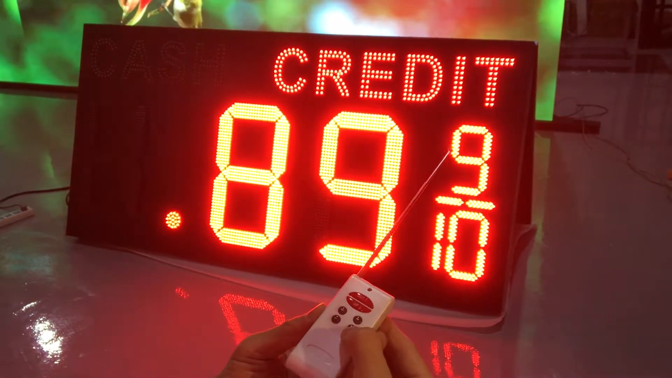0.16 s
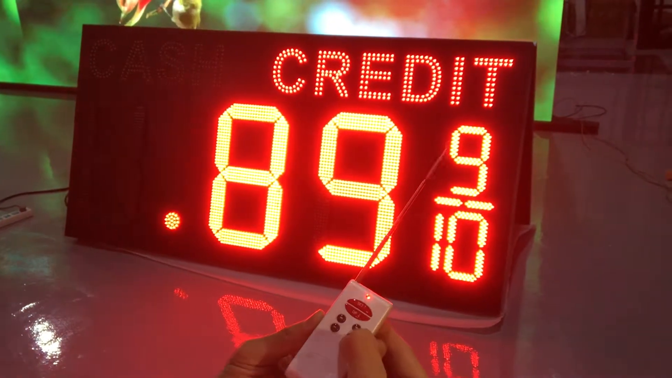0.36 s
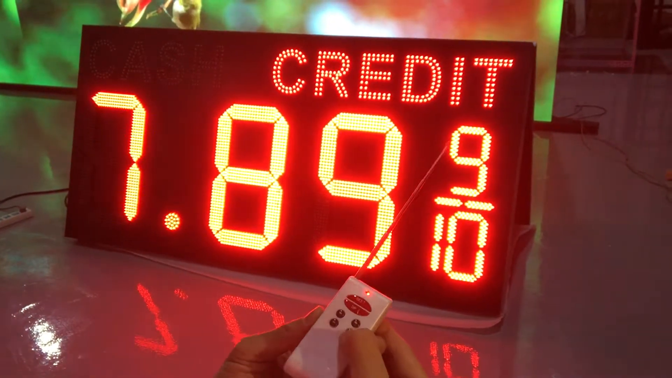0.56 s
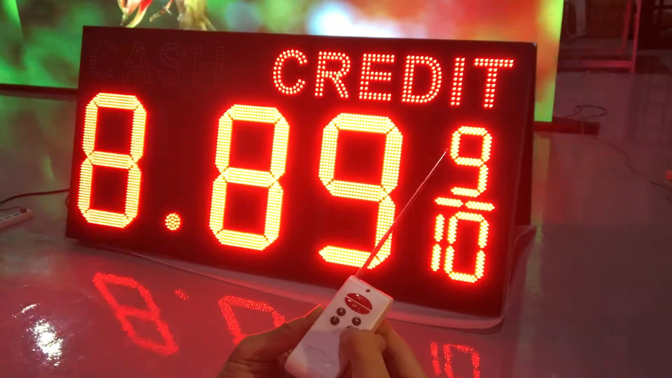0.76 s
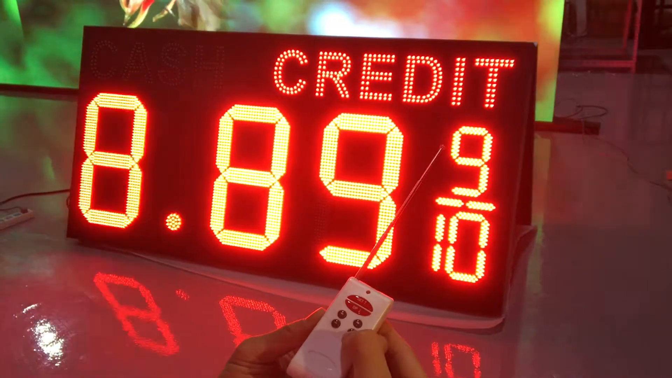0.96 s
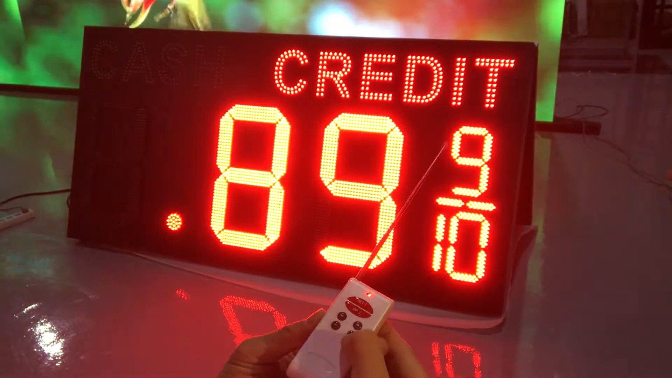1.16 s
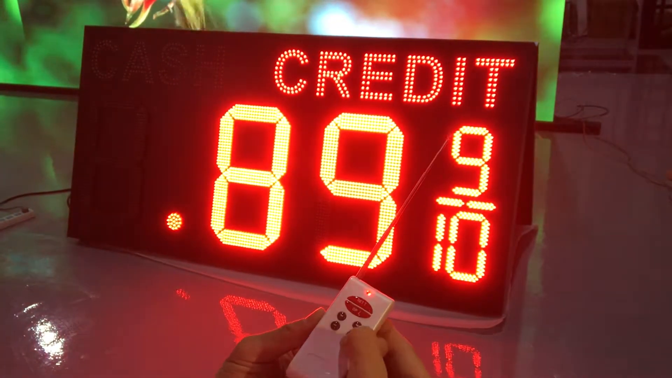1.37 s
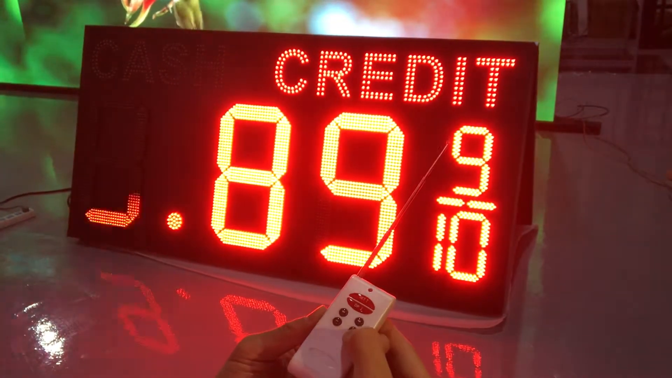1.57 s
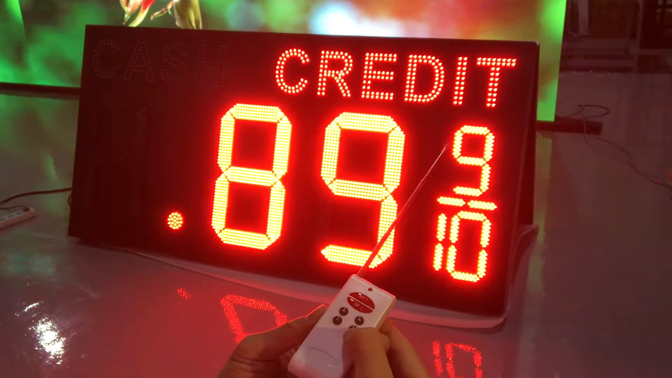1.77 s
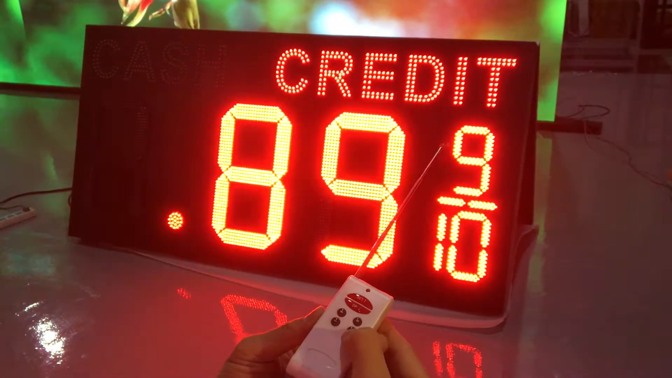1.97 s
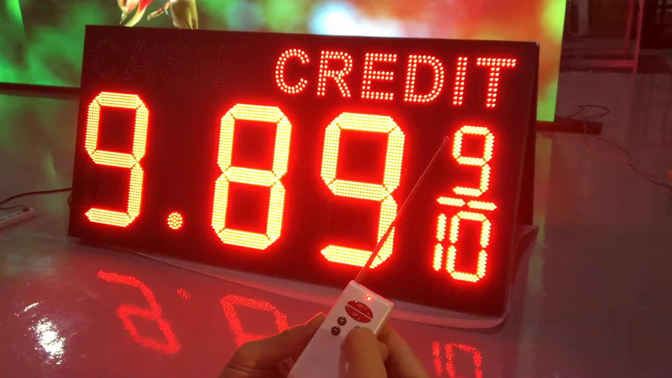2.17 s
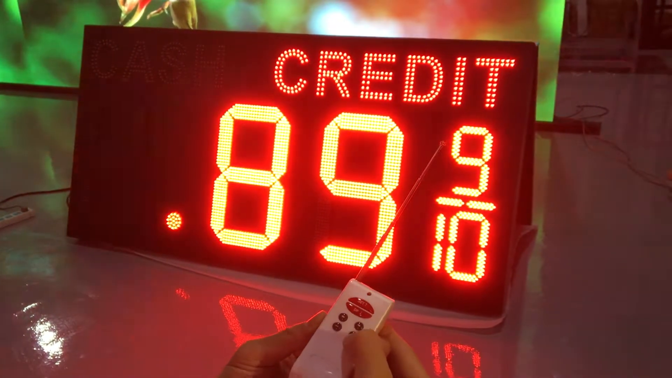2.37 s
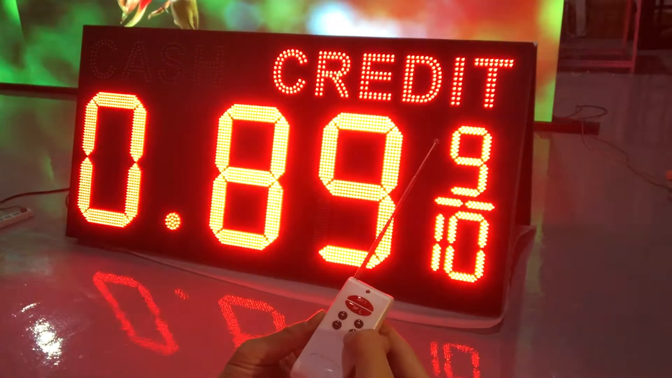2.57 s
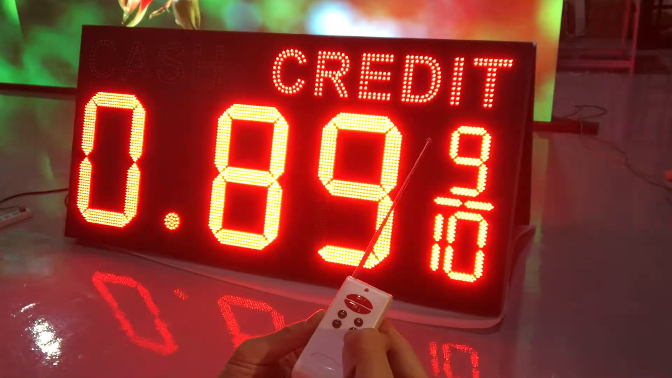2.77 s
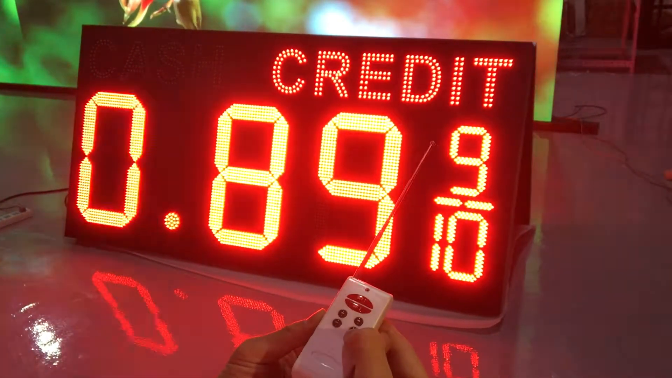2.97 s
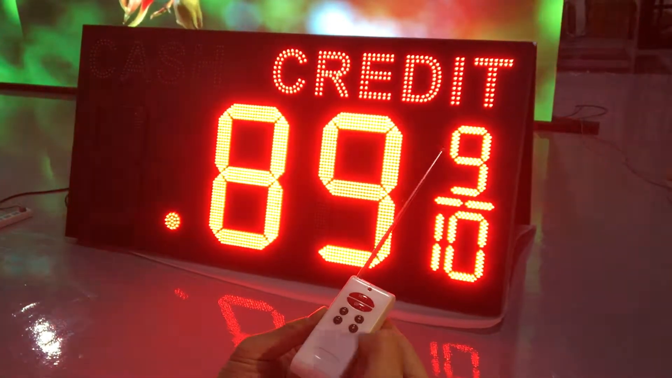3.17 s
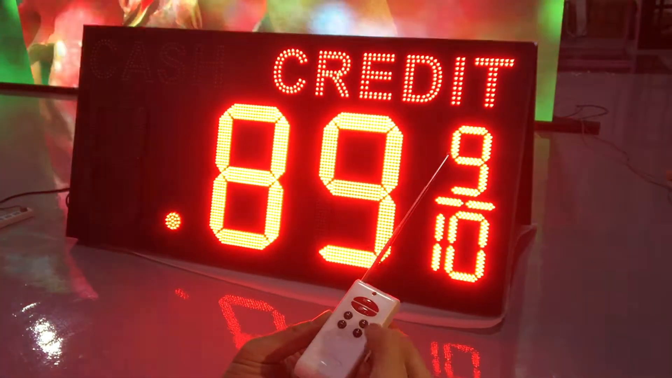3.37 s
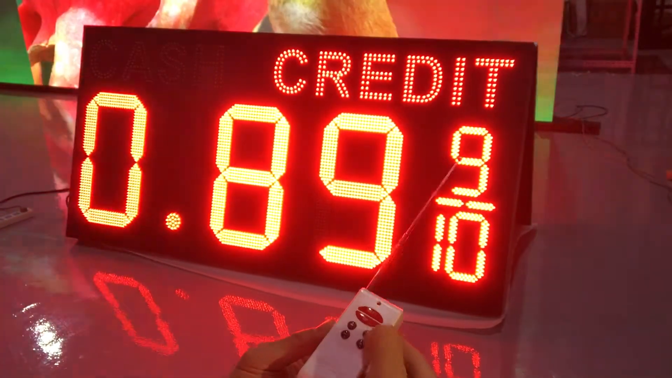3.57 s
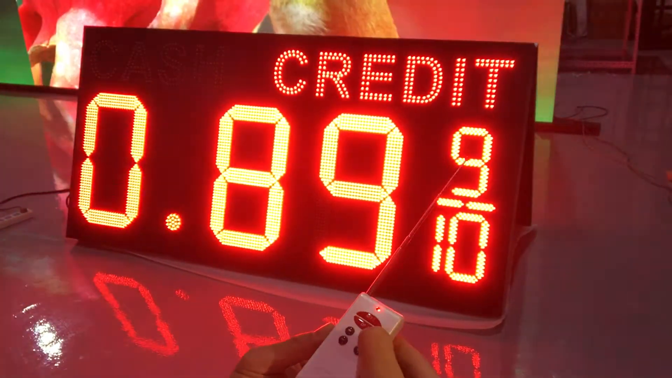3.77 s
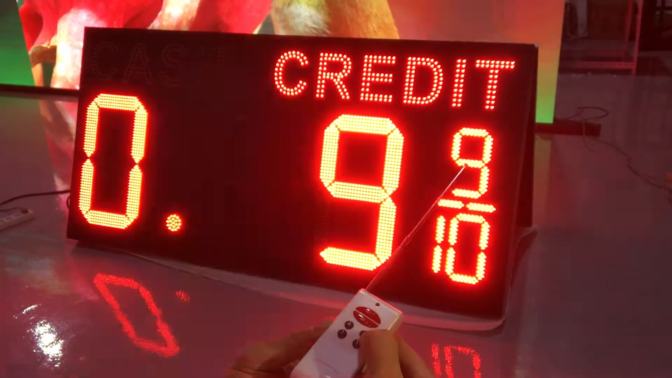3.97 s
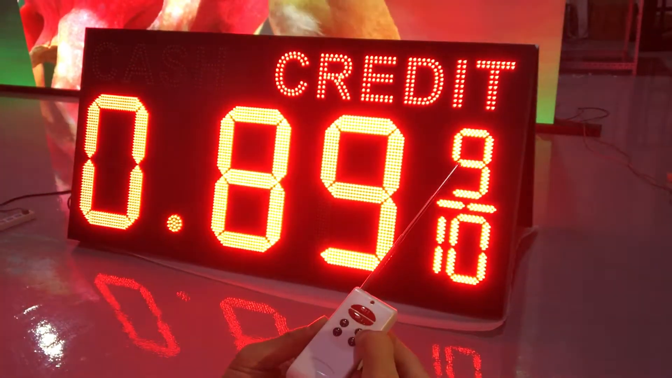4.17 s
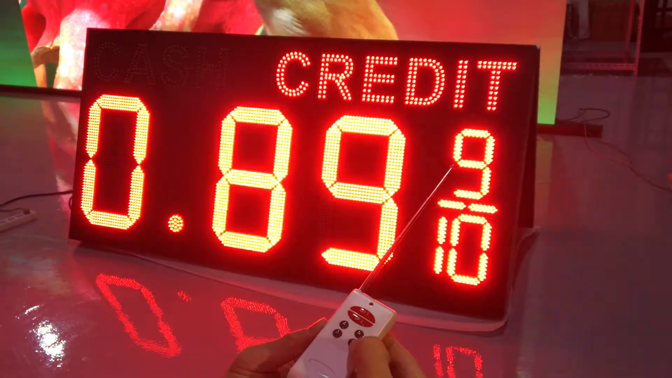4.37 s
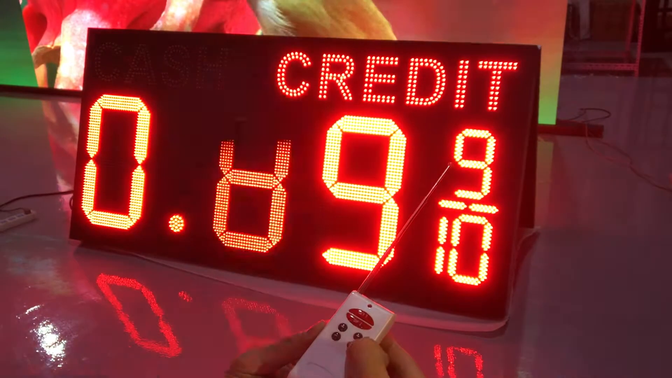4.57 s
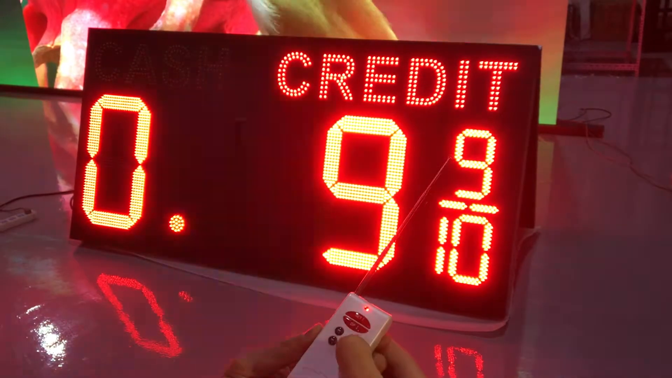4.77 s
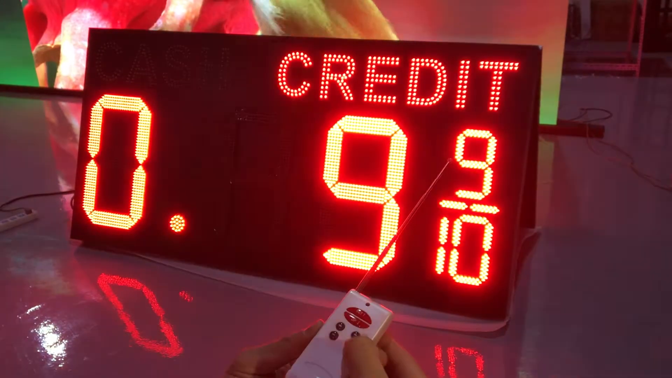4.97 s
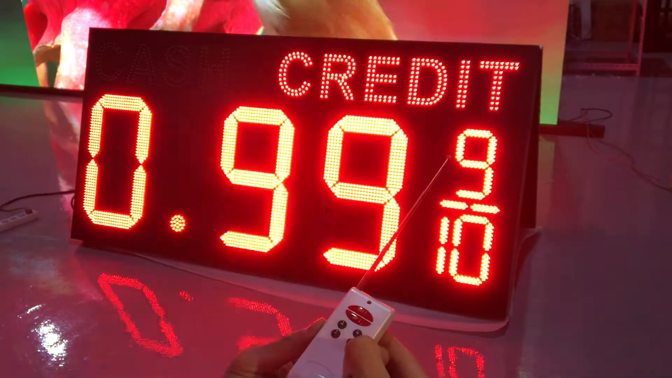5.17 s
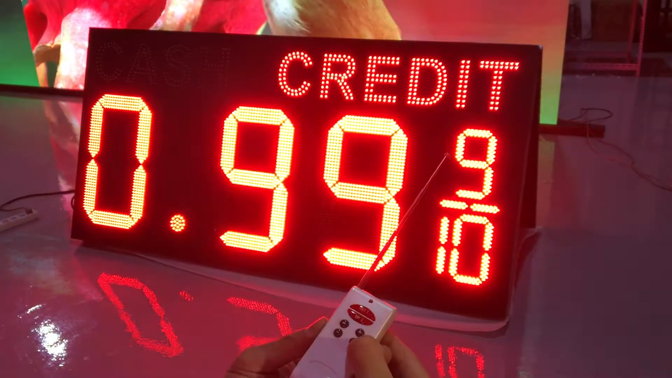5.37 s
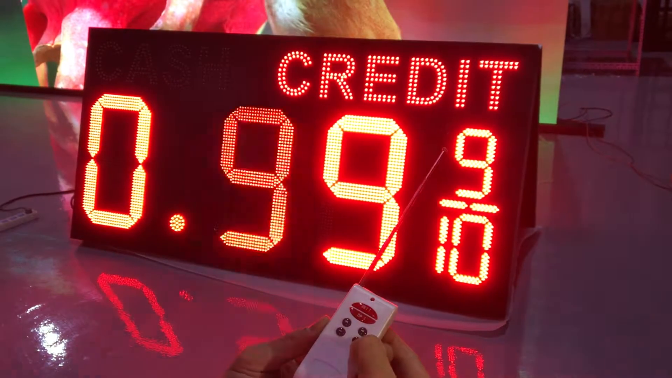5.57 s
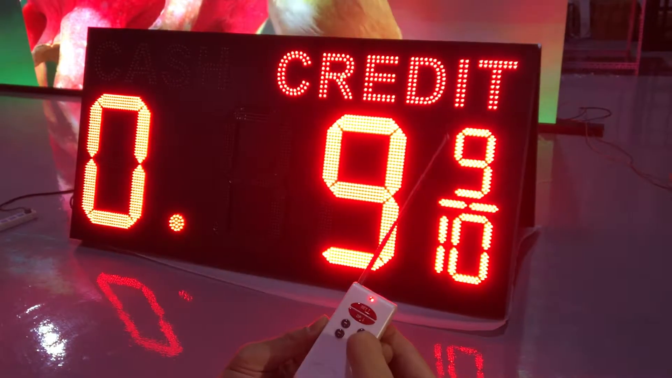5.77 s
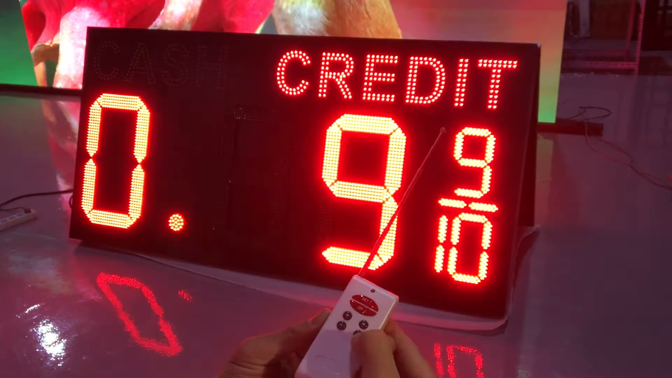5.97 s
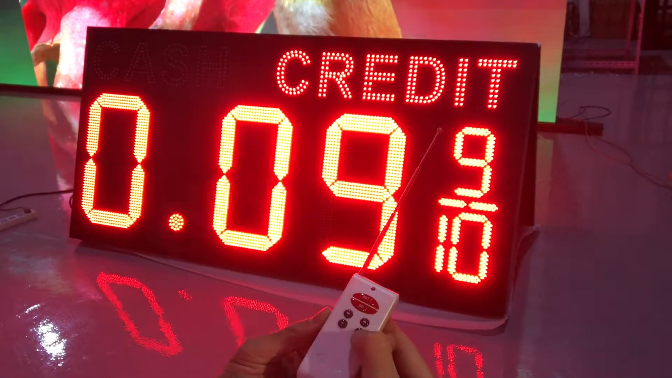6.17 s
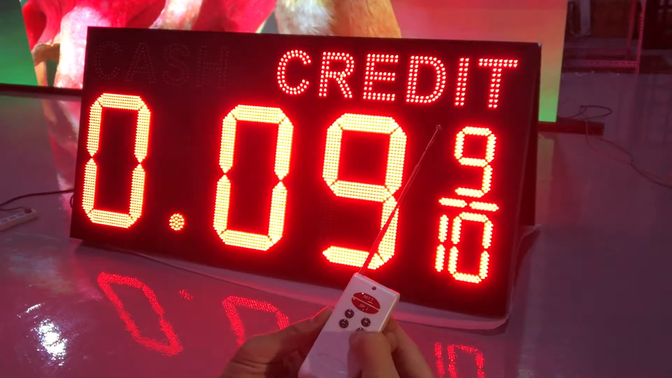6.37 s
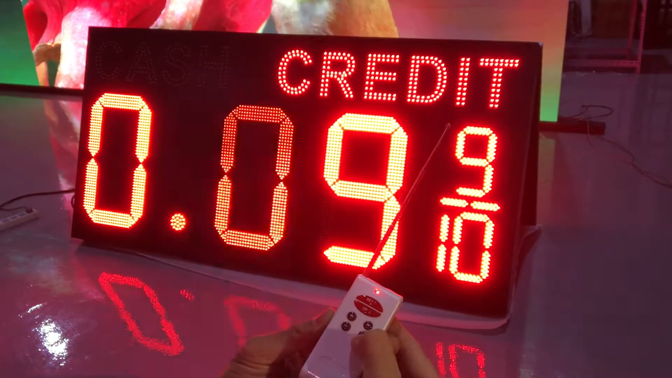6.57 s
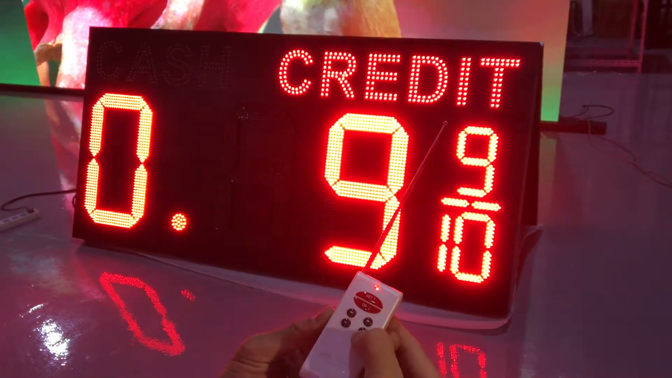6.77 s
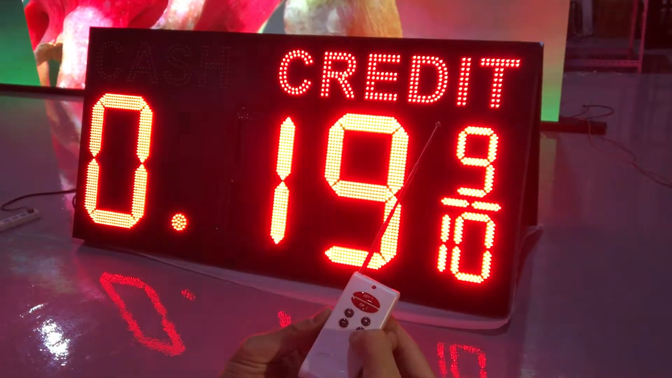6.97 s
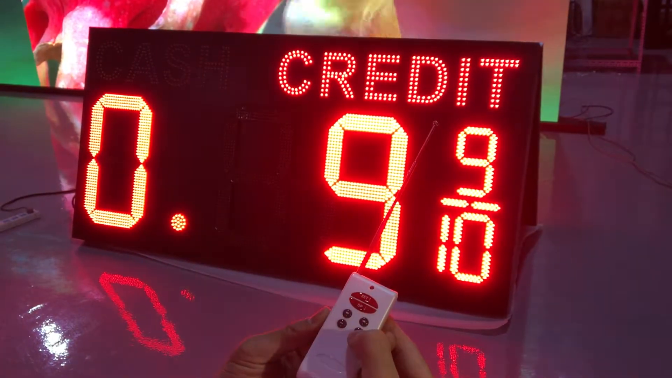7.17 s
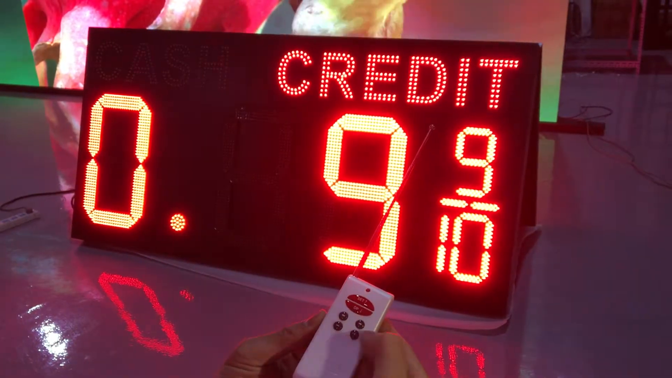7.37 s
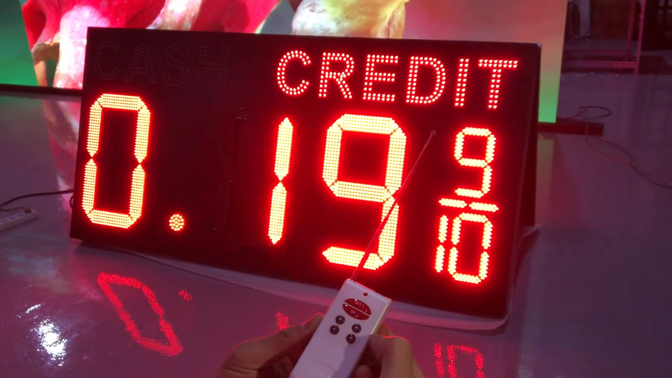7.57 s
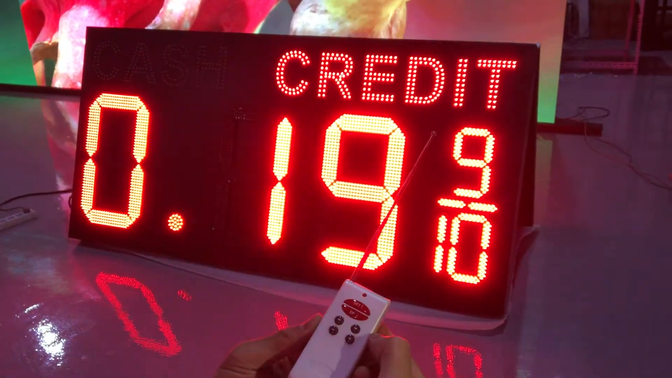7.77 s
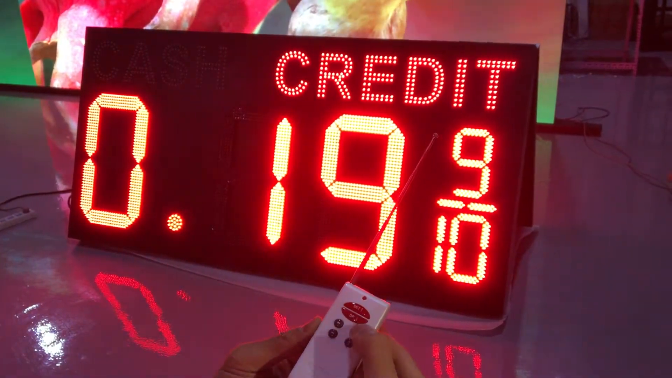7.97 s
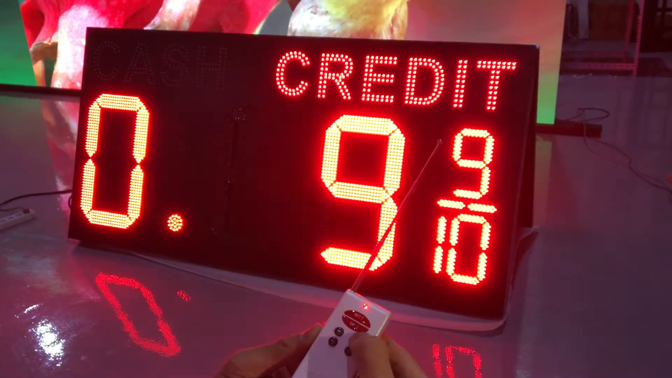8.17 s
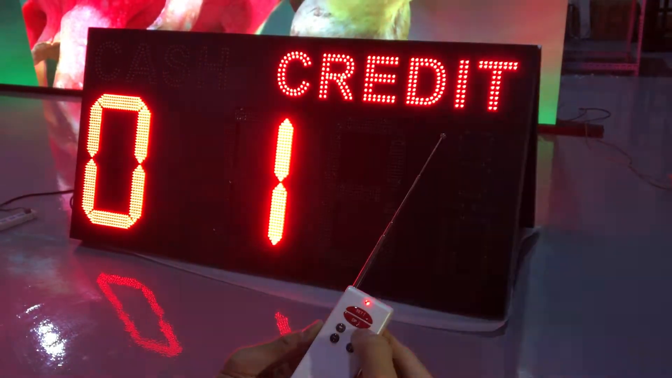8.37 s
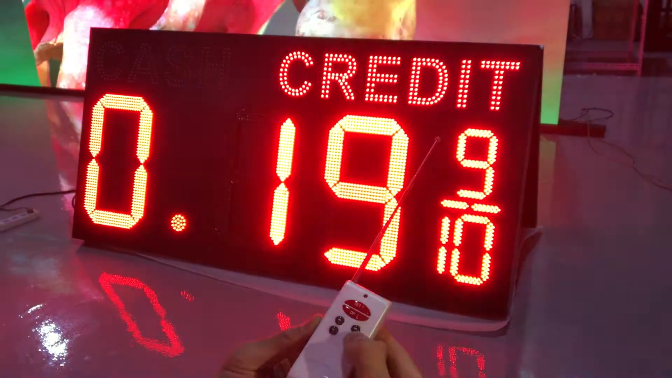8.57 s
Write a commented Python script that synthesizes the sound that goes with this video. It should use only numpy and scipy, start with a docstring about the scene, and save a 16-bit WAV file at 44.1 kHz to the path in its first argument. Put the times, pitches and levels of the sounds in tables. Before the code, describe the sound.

Close plastic remote control buttons click down and spring back about once a second over a faint ventilation hum.

```python
"""Remote control clicks in a hall

A thumb works the buttons of a small plastic remote eight times, close up, with faint ticks and rubs.
Each metal dome snaps down and springs back, and both snaps ring the case for a few milliseconds.
The floor and a large hall answer softly. Underneath lies a bed of humming ventilation,
a thin electrical whine and far-off noise that swells and fades."""
import sys
import numpy as np
from scipy import signal
from scipy.fft import rfft, irfft
from scipy.io import wavfile

SR = 44100
rng = np.random.default_rng(int(sys.argv[2]) if len(sys.argv) > 2 else 0)


def transcribe(u):
    """Save the signal u as a 16-bit wav file named by the first command-line argument.

    u: samples, shape (n,) or (channels, n), limited to [-1, 1]; the rate is SR.
    q: integer samples, one column per channel.
    """
    v = np.clip(np.atleast_2d(u).T, -1, 1)
    q = np.round(v * 32767).astype(np.int16)
    wavfile.write(sys.argv[1], SR, q)


N = 380583

# colour of the hall's steady air: freq_hz, relative_db
AIR_SPECTRUM = [(22, -17.5), (45, -3), (70, -1), (120, -2), (200, -4.5), (270, -11), (350, -10),
                (470, -18.5), (800, -23.5), (1600, -25.5), (3200, -35), (4800, -42.5), (10000, -47),
                (16000, -49)]
# resonances of the ventilation ducts: centre_hz, width_hz, level_db
DUCT_RESONANCES = [(51.3, 25, -57), (96, 8.8, -60), (297.5, 13, -72), (609, 143, -69.5)]
# colour of the far-off noise: freq_hz, relative_db
FAR_SPECTRUM = [(60, -9), (150, 1.5), (330, -0.5), (600, -12.5), (900, -13), (1600, -14.5), (3000, -24),
                (6000, -36.5), (12000, -50.5)]
# swells of the far-off noise: start_s, until_release_s, level_db
FAR_SURGES = [(1.55, 0.44, -57), (2.6, 0.56, -55.5), (3.581, 0.35, -55.5), (7.15, 0.42, -66.5)]
# thin tones of the electrical whine: pitch_hz, level_db
WHINE_TONES = [(2606, -91.5), (2842, -95), (3354, -88)]
# resonances of the plastic case: pitch_hz, t60_ms, down_db, back_db
CASE_MODES = [(1195, 9.4, -30.5, -29), (1764, 9.1, -31, -28.5), (2648, 7.8, -33, -30.5),
              (2915, 5.5, -28.5, -30), (3673, 12.3, -26.5, -26), (4410, 5.7, -39.5, -37.5),
              (5350, 6, -34, -33), (6480, 8.2, -38, -39), (6830, 7.2, -40.5, -38), (8200, 10, -39, -42.5),
              (8620, 10, -40, -42), (9640, 12, -47, -56), (11670, 6.6, -41, -63), (13950, 6, -40, -65),
              (15200, 3.5, -36, -58)]
# a snap's colour over all directions, where the case's peaks even out: freq_hz, down_db, back_db
ROOM_SEND_SPECTRUM = [(500, -15.5, -25.5), (1290, 3.5, 4.5), (1710, -1.5, 2.5), (2260, -2.5, 1.5),
                      (3760, -3, -4), (4500, -13, -12), (6000, -13, -11.5), (8940, -16, -19),
                      (10600, -21, -31), (12500, -11, -23), (16000, -22, -38)]
# button presses, with the key's place from mid-case (0) to rim (1):
# down_s, back_s, strength_db, rim_fraction, down_bright_db_per_octave, back_bright_db_per_octave
BUTTON_STROKES = [(.3243, .697, 0.5, .35, -.3, .3), (1.2456, 1.6413, 1, 0.2, -0.5, .5),
                  (2.1044, 2.4423, 1, 0.15, 0.4, 1.2), (3.7172, 4.0234, -3, 1, -0.5, -1.5),
                  (4.7249, 5.106, 1, 0.06, -1.5, -1.5), (5.7462, 6.0491, 1, 0, -0.5, 1),
                  (6.579, 6.8901, 1.55, 0.06, -0.5, 1), (8.1972, 8.4995, -2, 0.8, 0.2, 1)]
# the key shifts in its hole under the thumb: start_s, strength_db, bright_db_per_octave, main_mode_db
KEY_TICKS = [(0.483, -19.5, -0.5, -16), (.5072, -21, -1, -10), (0.638, -26.5, -8, -5),
             (0.6581, -15.5, 3.5, 0), (0.6601, -21, 1, -2), (1.319, -14, -2, -10), (1.341, -29, 1, -8),
             (2.163, -15, -0.5, -11), (4.0007, -24, 2, -8), (8.5778, -27, 5, 0)]
# the thumb rubs on the key: centre_s, length_s, strength_db
THUMB_RUBS = [(0.458, 0.055, -43), (0.646, .03, -34), (3.756, 0.47, -40)]
# diffuse tail of the hall: band_hz, gain_db, t60_s
HALL_BANDS = [(710, -13.5, 1.1), (1260, -22.5, 1.4), (1620, -16.5, 0.86), (2130, -24.5, 1.1),
              (2450, -22, 0.84), (3560, -21.5, 0.96), (4700, -23, 0.6), (6760, -21, 1), (14000, -22, 0.34)]
# early echoes off the floor and nearby surfaces: delay_ms, level_db
EARLY_ECHOES = [(6.8, -32), (16.5, -32), (24.2, -28.5), (30, -30), (35.2, -31)]


def undb(db):
    """Decibels to gain."""
    return 10 ** (np.asarray(db) / 20)


def unit(x):
    """Scale to rms 1."""
    return x / np.sqrt(np.mean(x ** 2))


def decay(t, t60_s):
    """A fade that falls 60 dB in t60_s."""
    return np.exp(-np.log(1000) * t / t60_s)


def add(out, start_s, sound):
    """Mix a sound in from start_s."""
    i = int(round(start_s * SR))
    out[i:i + len(sound)] += sound[:len(out) - i]


def shaped_noise(spectrum):
    """Noise of rms 1, coloured by an EQ curve."""
    hz, db = np.transpose(spectrum)
    f = np.maximum(np.arange(N // 2 + 1) * SR / N, 1)
    eq = undb(np.interp(np.log(f), np.log(hz), db))
    return unit(irfft(rfft(rng.standard_normal(N)) * eq, N))


def narrow_noise(hz, width_hz):
    """Noise of rms 1 in one resonance; at 0 Hz, a slow wander."""
    f = np.arange(N // 2 + 1) * SR / N
    return unit(irfft(rfft(rng.standard_normal(N)) / (1 + ((f - hz) / width_hz * 2) ** 2), N))


def tone(hz, db, waver_db, waver_rad):
    """A held tone that wavers slightly in level and pitch."""
    gain = undb(db + waver_db * narrow_noise(0, 6))
    drift = waver_rad * narrow_noise(0, 4)
    return np.sqrt(2) * gain * np.sin(2 * np.pi * hz * np.arange(N) / SR + drift)


def ventilation(air_db=-54.75, hum_hz=248.4, crest_db=-59, crest_s=5.9, slope_db_per_s=1.35):
    """Even air, resonating ducts and a motor hum that grows to one broad crest and eases off."""
    air = undb(air_db) * shaped_noise(AIR_SPECTRUM)
    ducts = sum(undb(db) * narrow_noise(hz, width_hz) for hz, width_hz, db in DUCT_RESONANCES)
    hum_db = crest_db - slope_db_per_s * np.abs(np.arange(N) / SR - crest_s)
    return air + ducts + tone(hum_hz, hum_db, waver_db=0.4, waver_rad=0.21)


def far_noise(rest_db=-68, attack_s=0.2, t60_s=2.6):
    """A dull, distant wash; each surge rises, holds and dies away in the hall."""
    t = np.arange(N) / SR
    power = undb(rest_db) ** 2
    for start_s, until_release_s, db in FAR_SURGES:
        attack = np.clip((t - start_s) / attack_s, 0, 1)
        release = decay(np.maximum(t - start_s - until_release_s, 0), t60_s)
        power = power + (undb(db) * attack * release) ** 2
    return np.sqrt(power) * shaped_noise(FAR_SPECTRUM)


def electrical_whine():
    """Three thin, wavering tones deep in the bed."""
    return sum(tone(hz, db, waver_db=1, waver_rad=0.5) for hz, db in WHINE_TONES)


def case_ring(down, db, bright, main_db=0, upper_db=0, t60_scale=1, detune=0.012, scatter_db=0.53):
    """One snap rings the plastic case; bright tilts it in dB per octave around 3 kHz."""
    hz, t60_ms, down_db, back_db = np.transpose(CASE_MODES)
    t = np.arange(SR // 25) / SR
    level_jitter, pitch_jitter = rng.standard_normal((len(hz), 2)).T
    mode_db = (down_db if down else back_db) + bright * np.log2(hz / 3000) + scatter_db * level_jitter
    mode_db[[4, 6]] += main_db, upper_db  # main mode at 3.7 kHz, upper mode at 5.4 kHz
    gain = undb(db + mode_db) * (-1) ** np.arange(len(hz))  # neighbouring modes swing opposite ways
    fade = decay(t, t60_ms[:, None] / 1000 * t60_scale)
    push = 1 if down else -1  # the dome pushes one way going down, the other coming back
    pitch_hz = hz * (1 + 0.0049 * push + detune * pitch_jitter)  # the pressing thumb stiffens the case
    swing = np.sin(2 * np.pi * np.outer(pitch_hz, t))
    return push * gain @ (fade * swing)


def dome_rebound(snap, lag_s=0.00055, rebound_db=-17):
    """The dome touches again about half a millisecond later, so no two snaps have quite one colour."""
    out = snap.copy()
    add(out, lag_s * np.exp(0.19 * rng.standard_normal()), undb(rebound_db) * snap)
    return out


def dome_shiver(db, t60_s=0.011, edge_hz=9000, rise_s=0.000067):
    """The thin metal dome shivers in many close treble modes: a tiny burst of sizzle."""
    t = np.arange(SR // 50) / SR
    highpass = signal.butter(2, edge_hz, "hp", fs=SR, output="sos")
    sizzle = unit(signal.sosfilt(highpass, rng.standard_normal(len(t))))
    return undb(db) * sizzle * (1 - np.exp(-t / rise_s)) * decay(t, t60_s)


def room_send(down, db, bright, size=512):
    """The snap as the room receives it: a short pulse with a smooth spectrum."""
    hz, down_db, back_db = np.transpose(ROOM_SEND_SPECTRUM)
    f = np.maximum(np.arange(size // 2 + 1) * SR / size, 1)
    colour_db = (down_db if down else back_db) + bright * np.log2(hz / 3000)
    magnitude = undb(db + np.interp(np.log(f), np.log(hz), colour_db))
    cepstrum = irfft(np.log(magnitude))
    causal = np.r_[cepstrum[0], 2 * cepstrum[1:size // 2]]  # minimum phase keeps the attack sharp
    return irfft(np.exp(rfft(causal, size)))


def button_snaps(near, send):
    """Each dome snaps down, then springs back a little weaker and with far less shiver."""
    for down_s, back_s, strength_db, rim, down_bright, back_bright in BUTTON_STROKES:
        press = (True, down_s, strength_db, down_bright, -39)
        release = (False, back_s, strength_db - 1, back_bright, -49)
        for down, start_s, db, bright, shiver_db in (press, release):
            # a key at the rim reaches less of the main mode, more of the upper, and shivers more
            snap = case_ring(down, db, bright, main_db=-3 * rim, upper_db=7 * rim)
            add(near, start_s, dome_rebound(snap))
            add(near, start_s, dome_shiver(db + shiver_db + 6 * rim))
            add(send, start_s, room_send(down, db, bright))


def key_ticks(near, send, shiver_db=-47):
    """The key shifts in its hole and ticks lightly against the case."""
    for start_s, db, bright, main_db in KEY_TICKS:
        add(near, start_s, case_ring(False, db, bright, main_db, upper_db=-8, detune=0.048))
        add(near, start_s, dome_shiver(db + 2 * bright + shiver_db))
        add(send, start_s, room_send(False, db, bright))


def thumb_rubs(near, slips_per_s=1500):
    """The thumb rubs the key: a swell of tiny slips, each ringing the damped case."""
    for centre_s, length_s, db in THUMB_RUBS:
        count = int(length_s * SR)
        slips = rng.standard_normal(count) * (rng.random(count) < slips_per_s / SR)
        ring = case_ring(False, db, bright=1, main_db=-3.5, t60_scale=0.6)
        add(near, centre_s - length_s / 2, np.convolve(slips * np.hanning(count), ring))


def remote(low_cut_hz=880):
    """The remote's close sound and its send to the room; the small case radiates no bass."""
    near, send = np.zeros((2, N))
    button_snaps(near, send)
    key_ticks(near, send)
    thumb_rubs(near)
    return signal.sosfilt(signal.butter(2, low_cut_hz, "hp", fs=SR, output="sos"), [near, send])


def hall(send, build_s=0.028, scatter_db=-22, scatter_t60_s=0.15, smear_s=0.0019):
    """A long tail that loses its treble first, led by nearby scatter and a few smeared echoes."""
    t = np.arange(SR) / SR
    f = np.maximum(np.arange(SR // 2 + 1), 1)
    hz, db, t60_s = np.transpose(HALL_BANDS)
    white = rfft(rng.standard_normal(SR))
    onset = 1 - np.exp(-(t / build_s) ** 2)
    response = np.zeros(SR)
    for share, band_db, band_t60_s in zip(np.eye(len(hz)), db, t60_s):
        band = irfft(white * np.interp(np.log(f), np.log(hz), share), SR)
        fade = onset * decay(t, band_t60_s)
        response += undb(band_db) * band * fade / np.linalg.norm(fade)
    scatter = rng.standard_normal(SR) * decay(t, scatter_t60_s)
    response += undb(scatter_db) * scatter / np.linalg.norm(scatter)
    for delay_ms, echo_db in EARLY_ECHOES:
        echo = rng.standard_normal(SR // 50) * np.exp(-t[:SR // 50] / smear_s)
        add(response, delay_ms / 1000, undb(echo_db) * echo / np.linalg.norm(echo))
    return signal.fftconvolve(send, response)[:N]


def scene():
    """The mono mix: the remote up front, its reverb and the background bed."""
    near, send = remote()
    bed = ventilation() + far_noise() + electrical_whine()
    return (near + hall(send) + bed)[None]


def record(dry, low_cut_hz=26, high_cut_hz=15900):
    """The microphone loses the deepest rumble; a steep filter cuts the very top."""
    dry = signal.sosfilt(signal.butter(4, low_cut_hz, "hp", fs=SR, output="sos"), dry)
    return signal.sosfilt(signal.ellip(8, 0.2, 70, high_cut_hz, fs=SR, output="sos"), dry)


dry = scene()
out = record(dry)
transcribe(out)
```